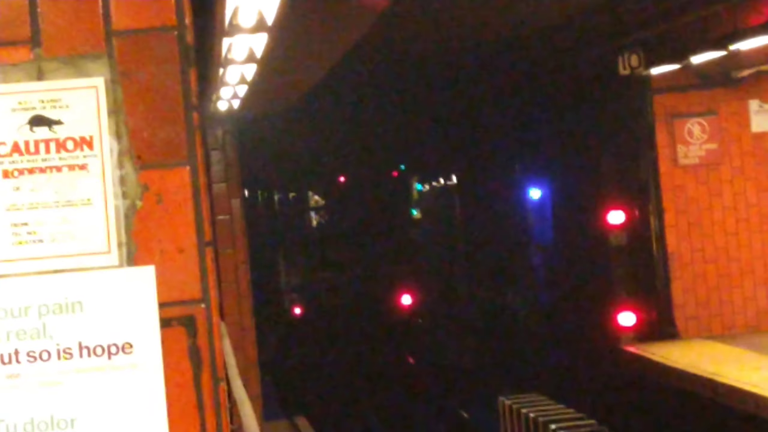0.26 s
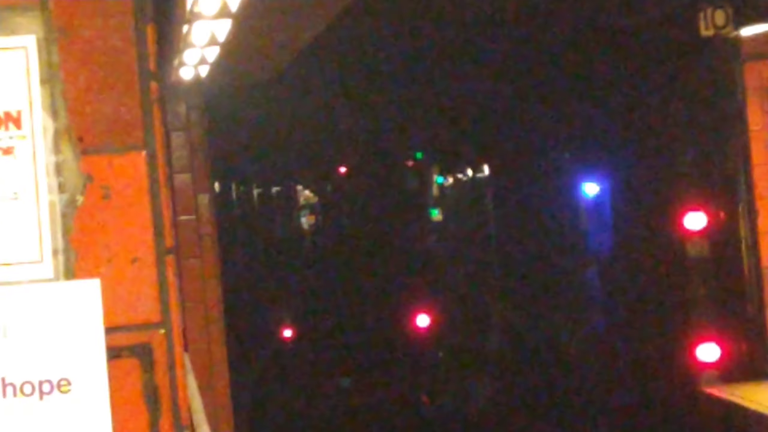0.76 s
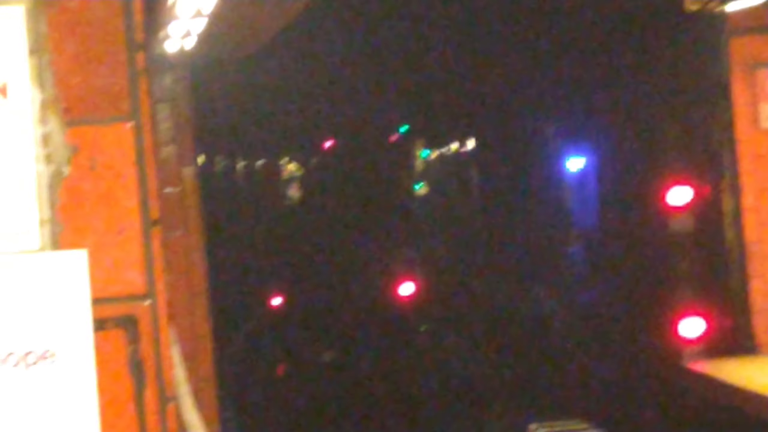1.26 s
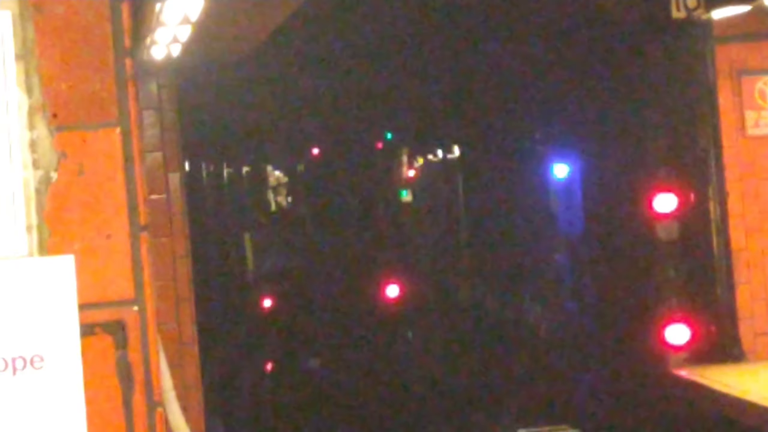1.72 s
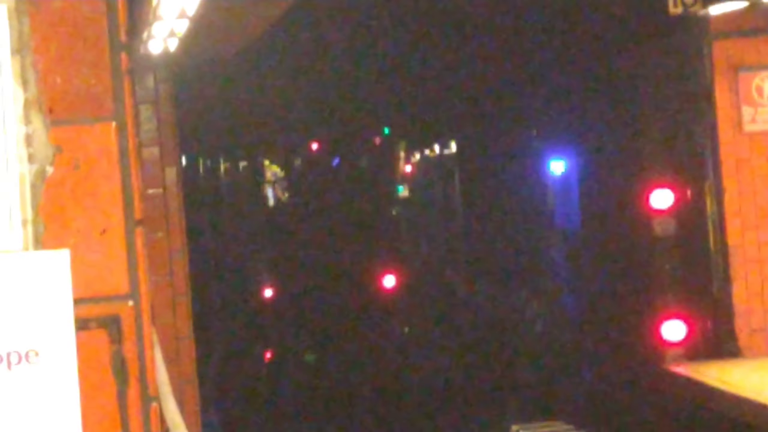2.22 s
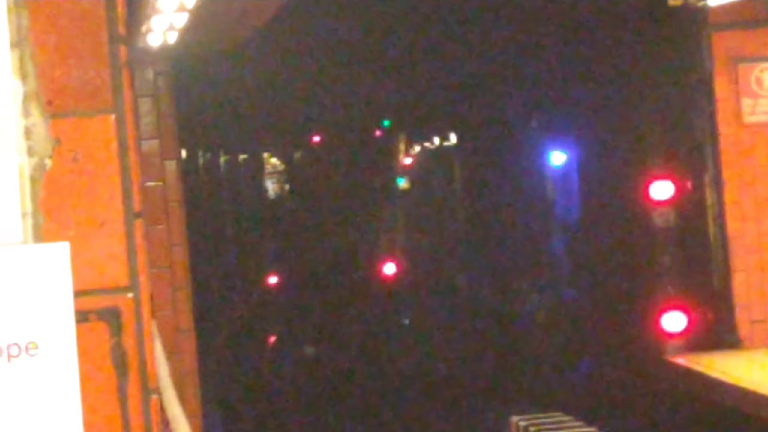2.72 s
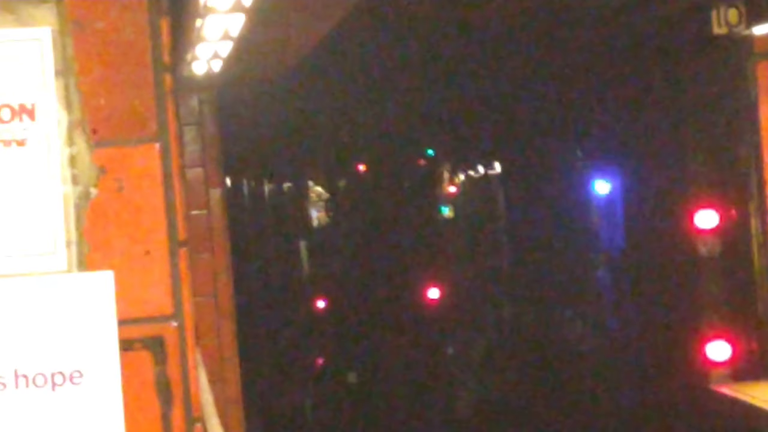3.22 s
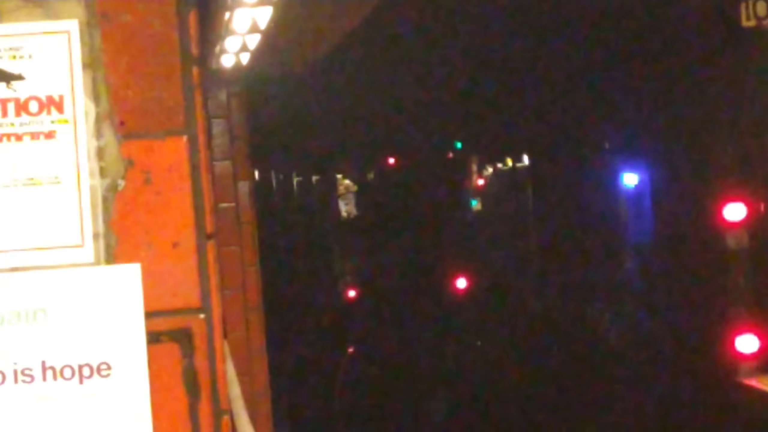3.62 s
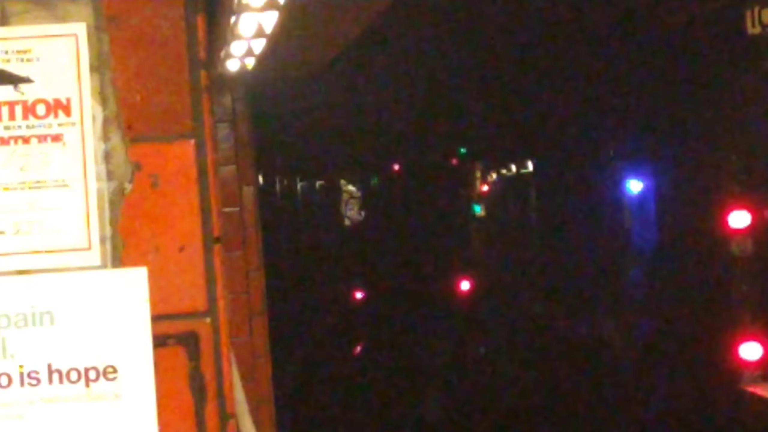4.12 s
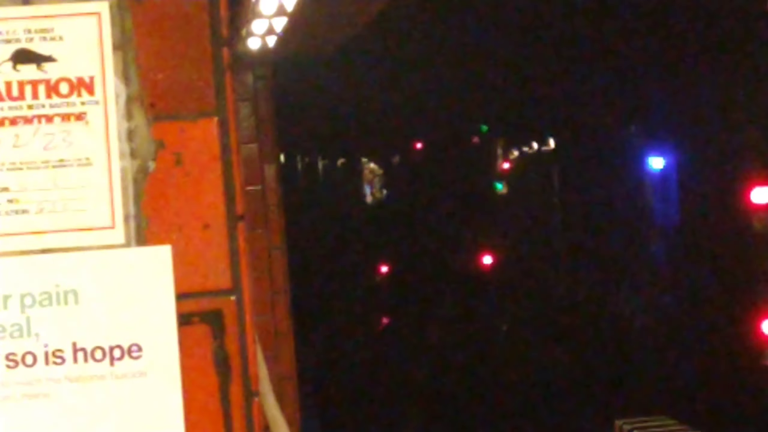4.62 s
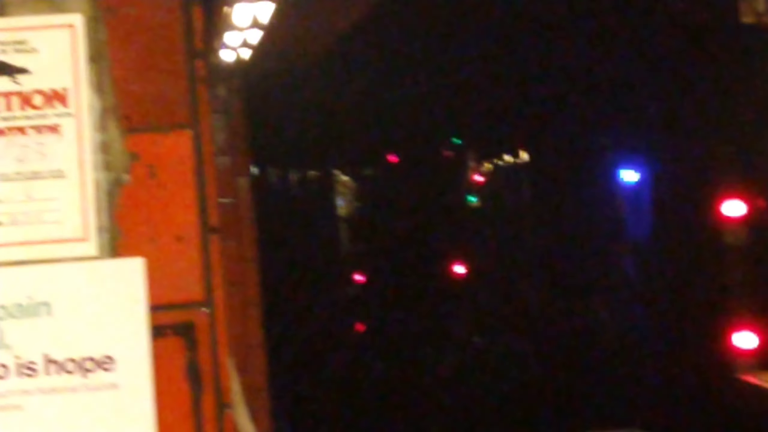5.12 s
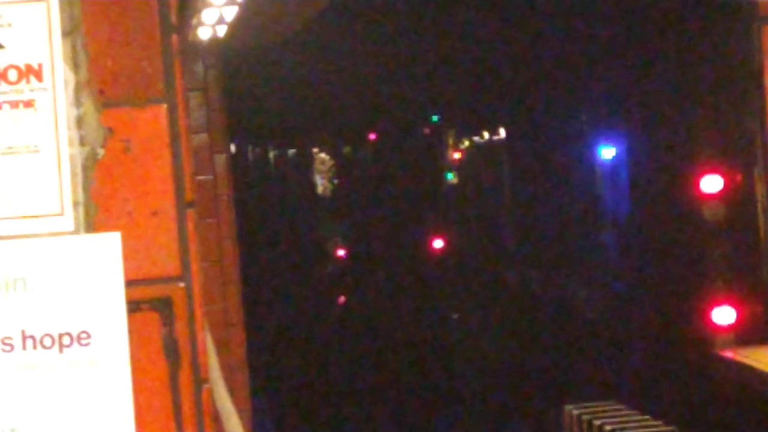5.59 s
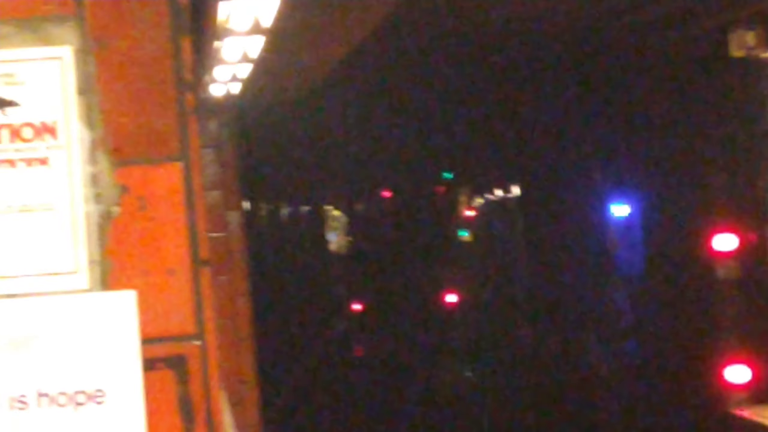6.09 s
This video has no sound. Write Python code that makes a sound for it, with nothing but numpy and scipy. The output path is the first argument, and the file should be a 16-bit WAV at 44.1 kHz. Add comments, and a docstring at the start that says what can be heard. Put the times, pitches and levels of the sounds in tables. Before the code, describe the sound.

A dark subway tunnel resonates with a bass drone, pulsing unevenly at first, dipping to a weaker murmur around the middle, then returning full and continuous. Beneath it, distant machinery rumbles in surges and muffled booms. A much quieter wide draught sighs and hisses around the platform, with a very faint high machine whine. The handheld stereo pickup hears the low sound centred and the air spread out.

```python
"""The drone of a big ventilation fan near 105 Hz, heard throughout at a subway tunnel mouth, from the platform end.
The blade tone is a sine that swells and fades in the tunnel, then holds loud; rough overtones ride on it.
Under it a deep rumble of shaped noise comes in surges and dull booms, with drifting tones for the ringing bore.
Shaped stereo noise makes the rush, sigh and whistle of air off the tiled walls, a hiss and a late sizzle.
A faint machine whine of drifting sines lies behind it all."""
import sys
import numpy as np
from scipy import signal
from scipy.fft import rfft, irfft, next_fast_len
from scipy.io import wavfile
from scipy.ndimage import uniform_filter1d, map_coordinates

SR = 44100
rng = np.random.default_rng(int(sys.argv[2]) if len(sys.argv) > 2 else 0)


def unload_wav(signal):
    """Save mono or channel-first audio to the path in sys.argv[1] as 16-bit WAV at rate SR, clipped to [-1, 1]."""
    wavfile.write(
        sys.argv[1],
        SR,
        np.round(np.clip(np.atleast_2d(signal).T, -1, 1) * 32767).astype(np.int16),
    )


N = 280035  # length in samples


def amp(db):
    """Decibels to gain."""
    return 10 ** (np.asarray(db) / 20)


def unit(x):
    """Scale to rms 1."""
    return x / np.sqrt(np.mean(np.abs(x) ** 2) + 1e-20)


def seconds():
    """The time of every sample."""
    return np.arange(N) / SR


def along(points, hz):
    """(frequency [Hz], value) points read on a log frequency axis."""
    f, v = np.transpose(points)
    return np.interp(np.log(hz + 1), np.log(f + 1), v)


def curve(rows):
    """(time [s], value) points joined by straight lines, one value per sample."""
    times, values = np.transpose(rows)
    return np.interp(seconds(), times, values)


def wobble(rate):
    """A smooth random curve through `rate` random knots a second."""
    knots = rng.standard_normal(1024)
    return map_coordinates(knots, [np.arange(N) * rate / SR + 2], mode="wrap")


def envelope(at_s, hold_s, rise_s, fall_s):
    """0 to 1: rises smoothly until at_s, holds, then falls away."""
    t = seconds()
    rising = 1 + (t - at_s) / rise_s
    falling = 1 - (t - at_s - hold_s) / fall_s
    ramp = np.clip(np.minimum(rising, falling), 0, 1)
    return ramp * ramp * (3 - 2 * ramp)


def lift(rows, rise_s, fall_s):
    """Summed gain in dB of (time [s], hold [s], gain [dB]) events."""
    return sum(db * envelope(s, hold_s, rise_s, fall_s) for s, hold_s, db in rows)


def filtered(x, response):
    """x shaped by a response of frequency, padded so that the end does not wrap onto the start."""
    m = next_fast_len(N + SR // 2)
    return irfft(rfft(x, m) * response(np.fft.rfftfreq(m, 1 / SR)), m)[..., :N]


def stereo(mid, side):
    """Left and right from mid and side."""
    return np.array([mid + side, mid - side])


def fuzzy_tone(phase, drift_rate):
    """A tone arriving over many shifting paths: strength and phase drift, drift_rate knots a second."""
    return unit(wobble(drift_rate) * np.sin(phase) + wobble(drift_rate) * np.cos(phase))


def noise_field(spectrum, width, patchy_db):
    """Stereo noise with mid rms 1, its gain patchy over time and frequency (patchy_db is the rms)."""
    z = signal.stft(rng.standard_normal((2, N)), nperseg=512)[2]
    patches = uniform_filter1d(rng.standard_normal(z.shape[1:]), size=5, axis=0)
    patches = uniform_filter1d(patches, size=16, axis=1)
    pair = signal.istft(z * amp(patchy_db * unit(patches)), nperseg=512)[1][:, :N]
    mid = filtered(pair[0], lambda hz: amp(along(spectrum, hz)))
    side = filtered(pair[1], lambda hz: amp(along(spectrum, hz) + along(width, hz)))
    return stereo(mid, side) / np.std(mid)


def moans(rows, rise_s, fall_s, jitter_rad):
    """Short rough tones from (time [s], hold [s], pitch [Hz], level [dB]) events, their phase jittered."""
    t = seconds()
    drift = jitter_rad * wobble(45)
    out = np.zeros(N)
    for s, hold_s, hz, db in rows:
        tone = np.sqrt(2) * np.sin(2 * np.pi * hz * (t - s) + drift)
        out += amp(db) * envelope(s, hold_s, rise_s, fall_s) * tone
    return out


# the lull of overtones, rumble body and sigh: (time [s], hold [s], rise [s], fall [s])
LULL = (5.2, .25, .28, .7)


def easing(fade_db_per_s, lull_db):
    """Level change in dB: a steady fade, and the lull."""
    return lull_db * envelope(*LULL) - fade_db_per_s * seconds()


# colour of the even hiss: (frequency [Hz], relative density [dB])
HISS_SPECTRUM = [(500, -9), (2000, 0.5), (3100, 1.5), (3420, -0.5), (3750, 3), (4200, 0.5), (5000, 0),
                 (7000, -3.5), (8300, -4), (10000, -11), (12500, -16.5), (15700, -19)]
# colour of the thin sizzle: (frequency [Hz], relative density [dB])
SIZZLE_SPECTRUM = [(1500, -42), (2700, -1), (3300, -1.5), (3900, 2.5), (4700, -10.5), (7000, -27)]
# the sizzle comes late: (time [s], hold [s], rise [s], fall [s])
SIZZLE = (5.4, .36, .35, .45)
HISS_DB, HISS_TREMBLE_DB, SIZZLE_DB = -66.0, 1.0, -71.5


def hiss():
    """An even, faintly trembling noise, joined briefly by a thin distant sizzle."""
    even = noise_field(HISS_SPECTRUM, [(3000, -.5), (12000, -.8)], patchy_db=1.5)
    sizzle = noise_field(SIZZLE_SPECTRUM, [(4000, -0.5)], patchy_db=0.5)
    hiss_level = amp(HISS_DB + HISS_TREMBLE_DB * wobble(45))
    return hiss_level * even + amp(SIZZLE_DB) * envelope(*SIZZLE) * sizzle


# lines of the faint machine whine: (frequency [Hz], level [dB])
WHINE_LINES = [(2638, -81.5), (3000, -78.5), (3119, -81.5), (3360, -86)]


def whine():
    """Thin lines of an electric machine, diffused by the station: each ear hears its own drift."""
    t, out = seconds(), np.zeros((2, N))
    for hz, db in WHINE_LINES:
        phase = 2 * np.pi * hz * t
        out += amp(db) * np.array([fuzzy_tone(phase, drift_rate=5) for ear in range(2)])
    return out


# stereo width of whistle, rush and sigh: (frequency [Hz], side minus mid [dB])
AIR_WIDTH = [(300, -3.5), (500, -3.5), (750, -5), (1000, -1.5), (1400, 2), (1800, 3.5), (2200, -4.5),
             (2700, 0.5), (3500, -2)]
# the draught sings faintly: (time [s], hold [s], level [dB])
WHISTLES = [(4.42, .25, -66), (4.8, .12, -65)]
# colour of the whistle: (frequency [Hz], relative density [dB])
WHISTLE_SPECTRUM = [(1550, -41), (1750, -9), (1900, -1), (2100, 0), (2270, -1), (2420, -16.5),
                    (2800, -44.5)]
WHISTLE_RISE_S, WHISTLE_FALL_S = .15, .15


def whistle():
    """Air briefly sings as noise in a narrow band near 2 kHz."""
    level = 0
    for s, hold_s, db in WHISTLES:
        level = level + amp(db) * envelope(s, hold_s, WHISTLE_RISE_S, WHISTLE_FALL_S)
    return level * noise_field(WHISTLE_SPECTRUM, AIR_WIDTH, patchy_db=2.1)


# strength of the broad rush before gusts and balance: (time [s], level [dB])
DRAUGHT = [(0, -44.5), (.15, -47.5), (.5, -49), (2.05, -50), (2.7, -50.5), (3.2, -50.5), (3.72, -49.5),
           (3.95, -51), (4.7, -52.5), (4.97, -52.5), (5.08, -55.8), (5.55, -56), (5.9, -55), (6.3, -52.5)]
# colour of the broad rush: (frequency [Hz], relative density [dB])
RUSH_SPECTRUM = [(150, -16.5), (350, 5.5), (520, 2.5), (600, 0.5), (720, 0.5), (1000, -3.5), (1300, -6.5),
                 (1600, -10), (1900, -11), (2300, -12.5), (2600, -15.5), (3050, -17.5), (3400, -27.5),
                 (9000, -62.5)]
# the sigh's two colours: (frequency [Hz], relative density [dB])
SIGH_BRIGHT = [(1100, -30), (1500, -6.5), (1850, -7), (2050, 0), (2330, 0.5), (2540, -12.5), (2780, -4.5),
               (3050, -9.5), (3350, -28.5), (6000, -60.5)]
SIGH_DARK = [(1200, -34), (1650, -13), (1850, -2), (2050, 1), (2300, -7), (2600, -14.5), (3000, -11),
             (3400, -30), (6000, -60)]
# gusts that mostly lift the sigh: (time [s], hold [s], gain [dB])
GUSTS = [(0, 0.14, -2), (1.6, 0.26, 2.5), (2.8, 0.55, 4), (4.5, .45, 3), (5.52, 0.9, 6.2), (6, .35, 1.5)]
# the sigh slowly darkens, then starts to brighten: (time [s], hold [s], rise [s], fall [s])
DARKENING = (4.8, .2, 4.2, 3)
GUST_RISE_S, GUST_FALL_S = .22, .17
RUSH_GUST_SHARE = 0.062  # the broad rush follows a gust only slightly
DARK_SHARE = 0.67  # power share of the dark colour at its height
SIGH_START_DB, SIGH_FADE_DB_PER_S, SIGH_LULL_DB = -60.5, 1.85, -4


def air():
    """The draught comes off the tiles from all sides, more from the right, with a sigh near 2 kHz."""
    gust_db = lift(GUSTS, GUST_RISE_S, GUST_FALL_S)
    rush_db = curve(DRAUGHT) + RUSH_GUST_SHARE * gust_db
    sigh_db = SIGH_START_DB + easing(SIGH_FADE_DB_PER_S, SIGH_LULL_DB) + gust_db
    darkness = np.clip(DARK_SHARE * envelope(*DARKENING), 0, 1)
    broad = amp(rush_db) * noise_field(RUSH_SPECTRUM, AIR_WIDTH, patchy_db=1.13)
    bright = np.sqrt(1 - darkness) * noise_field(SIGH_BRIGHT, AIR_WIDTH, patchy_db=1.9)
    dark = np.sqrt(darkness) * noise_field(SIGH_DARK, AIR_WIDTH, patchy_db=1.0)
    balance = amp([[-.9], [.9]])  # left, right
    return (broad + amp(sigh_db) * (bright + dark)) * balance


# narrow ringing bands: (frequency [Hz], level against the rumble's body [dB], drift [knots/s])
BORE_MODES = [(159.9, -11.5, 9), (277.8, -16, 11), (332.8, -20.5, 12), (453.4, -22, 20), (497, -29.5, 12)]
BORE_WANDER_DB, BORE_WANDER_RATE, BORE_SIDE_DB = 1.3, 2, -14  # rate in knots a second


def bore():
    """Cross resonances of the tunnel: soft bands, each swelling and fading on its own."""
    t, out = seconds(), np.zeros((2, N))
    for hz, db, drift_rate in BORE_MODES:
        phase = 2 * np.pi * hz * t
        side = amp(BORE_SIDE_DB) * fuzzy_tone(phase, drift_rate)
        ring = stereo(fuzzy_tone(phase, drift_rate), side)
        out += amp(db + BORE_WANDER_DB * wobble(BORE_WANDER_RATE)) * ring
    return out


# colours of the deep rumble and of its body: (frequency [Hz], relative density [dB])
DEEP_SPECTRUM = [(15, -37), (27, -25), (36, -8.5), (55, -2.5), (75, 4.5), (100, -1), (120, -0.5),
                 (150, -21.5), (220, -75)]
BODY_SPECTRUM = [(70, -40), (115, -4.5), (140, 0), (165, -1), (190, -3), (225, -3), (248, -8.5), (290, -8),
                 (350, -13), (420, -16), (465, -19), (520, -26.5), (650, -39.5), (1200, -71.5)]
# surges of the deep rumble: (time [s], hold [s], gain [dB])
SURGES = [(.82, 0.16, 1), (1.8, 0.12, 2.5), (2.4, 0.9, 1.5), (3.62, 0.29, 2.5), (4.62, 0.3, 1.5),
          (5.45, 0.2, 3), (6.15, 0.19, 4)]
# dull booms far down the bore: (time [s], hold [s], pitch [Hz], level [dB])
BOOMS = [(.82, .04, 72, -31.5), (.84, .04, 161.5, -37), (.85, .02, 317, -42.5), (2.33, .02, 314, -43.5),
         (2.52, .033, 150, -36), (3.68, .06, 76, -36.5), (4.7, .03, 78, -34), (5.44, .03, 133.7, -31),
         (5.59, .04, 70, -32.5), (5.62, .04, 133.5, -37)]
SURGE_RISE_S, SURGE_FALL_S = 0.18, 0.4
DEEP_DB = -37.5  # between surges
BODY_START_DB, BODY_FADE_DB_PER_S, BODY_LULL_DB = -34, 0.6, -4
BODY_SURGE_SHARE = 0.42  # share of each surge's dB that the body takes
BOOM_RISE_S, BOOM_FALL_S, BOOM_JITTER_RAD = 0.15, 0.086, 0.99


def rumble():
    """Far machinery rolls down the bore in surges and booms; the long waves reach both ears nearly alike."""
    surge_db = lift(SURGES, SURGE_RISE_S, SURGE_FALL_S)
    body_db = BODY_START_DB + easing(BODY_FADE_DB_PER_S, BODY_LULL_DB) + BODY_SURGE_SHARE * surge_db
    deep = noise_field(DEEP_SPECTRUM, [(30, -22.5), (100, -15.5)], patchy_db=1.5)
    body = noise_field(BODY_SPECTRUM, [(150, -24.0), (300, -18.5), (500, -16.5)], patchy_db=0.5)
    booms = moans(BOOMS, BOOM_RISE_S, BOOM_FALL_S, BOOM_JITTER_RAD)
    return amp(DEEP_DB + surge_db) * deep + amp(body_db) * (body + bore()) + booms


# swells of the blade tone, before dips and crest: (time [s], hold [s], level [dB])
SWELLS = [(0.014, .02, -20), (0.29, 0.085, -22), (0.5, 0.22, -17.5), (0.892, 0.071, -22),
          (1.147, 0.029, -24.5), (1.41, 0.055, -24.5), (1.68, .02, -29), (1.925, 0.012, -20),
          (2.105, 0.01, -24), (2.518, 0.15, -18), (2.823, 0.029, -24.5), (3.423, 0.02, -31),
          (3.709, 0.081, -20), (4.017, 0.017, -24), (4.213, 0.038, -24.5), (4.477, 1.827, -17)]
# brief level changes of the blade tone, mostly dips: (time [s], gain [dB])
DIPS = [(.17, 0), (1.26, -9), (1.76, -3.5), (2.21, -4.5), (2.32, -5), (2.75, -3), (2.99, -3), (3.14, -6),
        (3.25, -3), (3.49, -8.5), (3.92, 0.5), (4.33, 1), (6.26, -4)]
# the last swell climbs to a crest: (time [s], hold [s], rise [s], fall [s])
CREST = (5.28, .25, .45, .75)
CREST_DB = 3
SWELL_RISE_S, SWELL_FALL_S = 0.18, 0.17
TROUGH_DB, TROUGH_WAVER_DB, TROUGH_RATE = -30.5, 1.1, 8.8  # between swells; rate in knots a second
DIP_S = 0.052  # time to sink, and to come back


def drone_level():
    """Strength of the blade tone: swells and a wavering trough add in power, then dips and crest act."""
    trough = amp(TROUGH_DB + TROUGH_WAVER_DB * wobble(TROUGH_RATE))
    swells = [amp(db) * envelope(s, hold_s, SWELL_RISE_S, SWELL_FALL_S) for s, hold_s, db in SWELLS]
    dip_db = sum(db * envelope(s, 0, DIP_S, DIP_S) for s, db in DIPS)
    return np.linalg.norm([trough, *swells], axis=0) * amp(dip_db + CREST_DB * envelope(*CREST))


# the fan's speed: (time [s], blade rate [Hz])
SPEED = [(0, 104.8), (2.3, 104.6), (2.95, 104.9), (3.15, 107), (3.5, 105.2), (4.3, 105.5), (4.8, 105.1),
         (6.35, 105.3)]
# overtones smeared by turbulence:
# (multiple of blade rate, level before fade and lull [dB], drift [knots/s], side minus mid [dB])
OVERTONES = [(2, -42.3, 11, -10), (3, -50, 11, -10.5)]
# flares near twice the blade rate: (time [s], hold [s], pitch [Hz], level [dB])
FLARES = [(.24, .06, 210.8, -40), (.6, .03, 211, -38), (.82, 0.048, 211.7, -41.5),
          (1.04, 0.022, 213.3, -37), (1.19, 0.018, 212, -36.5), (1.32, 0.058, 209, -31.5),
          (1.77, 0.044, 208.6, -35.5), (2.46, .02, 212.5, -36), (2.71, 0.022, 210.5, -36.5),
          (2.88, .05, 222, -39), (4.59, 0.031, 214.6, -37)]
OVERTONE_LULL_DB, OVERTONE_FADE_DB_PER_S = -7, 0.46
TREMBLE_DB, TREMBLE_RATE = 0.28, 18  # quick unsteadiness of the tone; rate in knots a second
FLARE_RISE_S, FLARE_FALL_S, FLARE_JITTER_RAD = .09, 0.097, 0.53
BLADE_SIDE_DB = -44.0


def fan():
    """The blade tone booms along the tunnel; cross reflections add a weak drifting side part."""
    phase = 2 * np.pi * np.cumsum(curve(SPEED)) / SR
    tremble = amp(TREMBLE_DB * wobble(TREMBLE_RATE))
    tone = drone_level() * tremble * unit(np.sin(phase))
    out = stereo(tone, amp(BLADE_SIDE_DB) * fuzzy_tone(phase, drift_rate=4))
    overtone_db = easing(OVERTONE_FADE_DB_PER_S, OVERTONE_LULL_DB)
    for multiple, db, drift_rate, side_db in OVERTONES:
        turn = multiple * phase
        side = amp(side_db) * fuzzy_tone(turn, drift_rate)
        out += amp(db + overtone_db) * stereo(fuzzy_tone(turn, drift_rate), side)
    return out + moans(FLARES, FLARE_RISE_S, FLARE_FALL_S, FLARE_JITTER_RAD)


def scene():
    """Everything that fills the tunnel mouth, from the faint background to the fan."""
    return hiss() + whine() + whistle() + air() + rumble() + fan()


TOP_HZ = 15720


def record(dry):
    """The microphone channel passes nothing from its band limit upward."""
    return filtered(dry, lambda hz: hz < TOP_HZ)


dry = scene()
out = record(dry)
unload_wav(out)
```